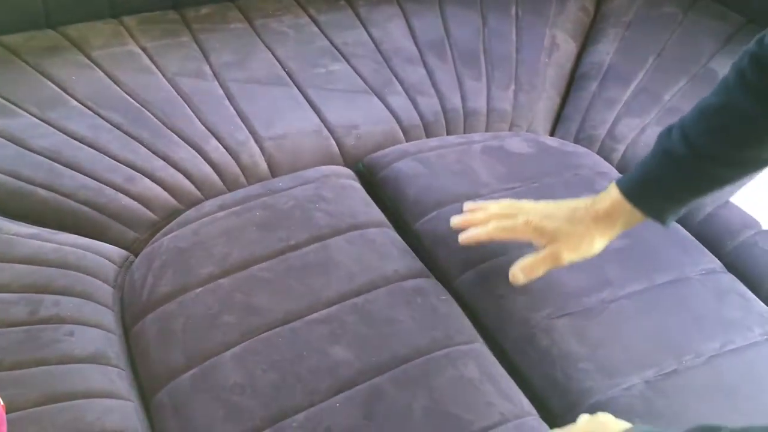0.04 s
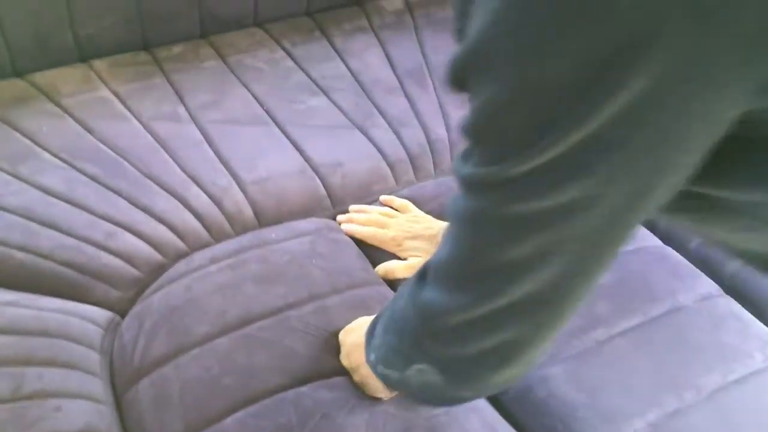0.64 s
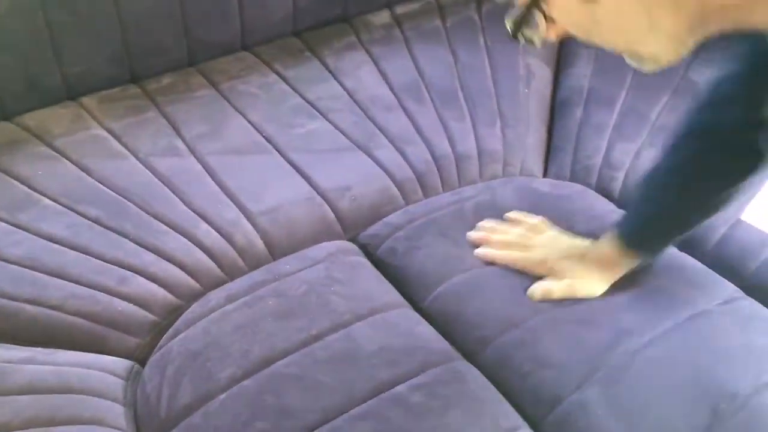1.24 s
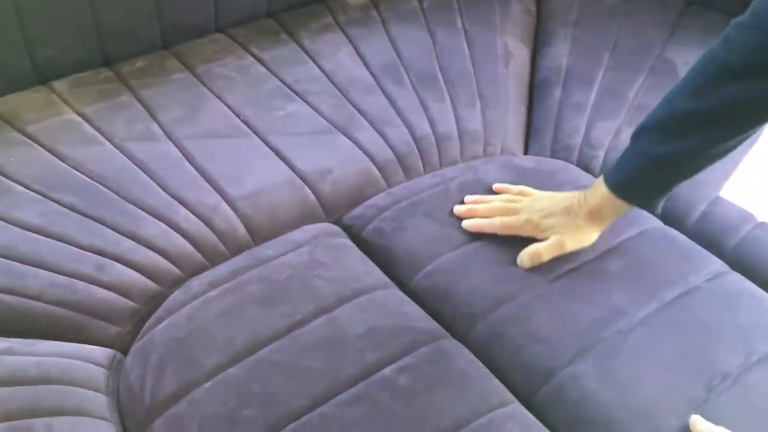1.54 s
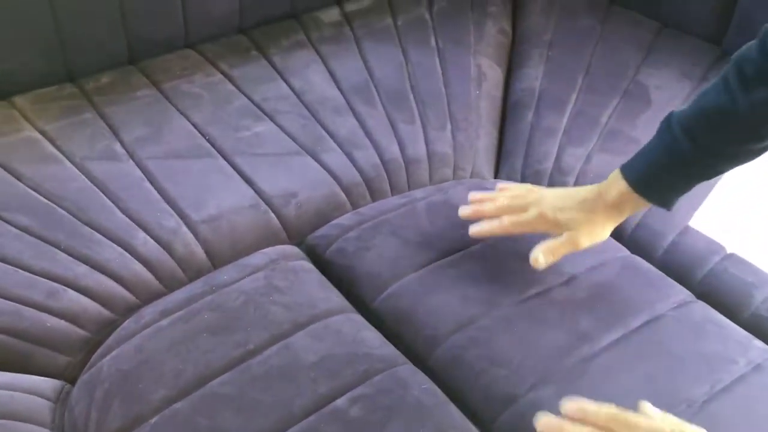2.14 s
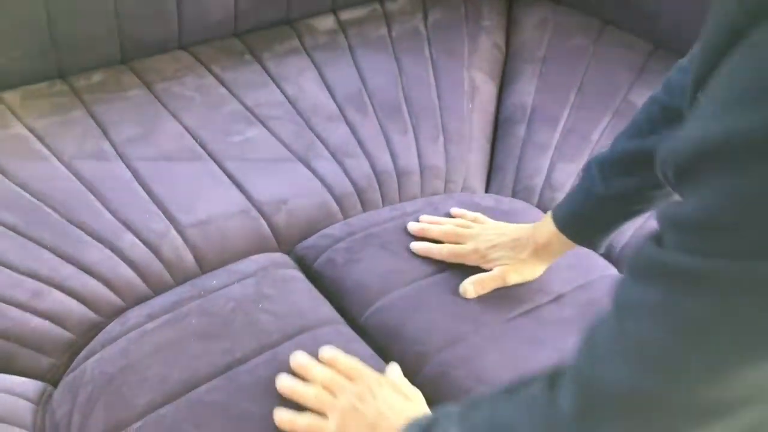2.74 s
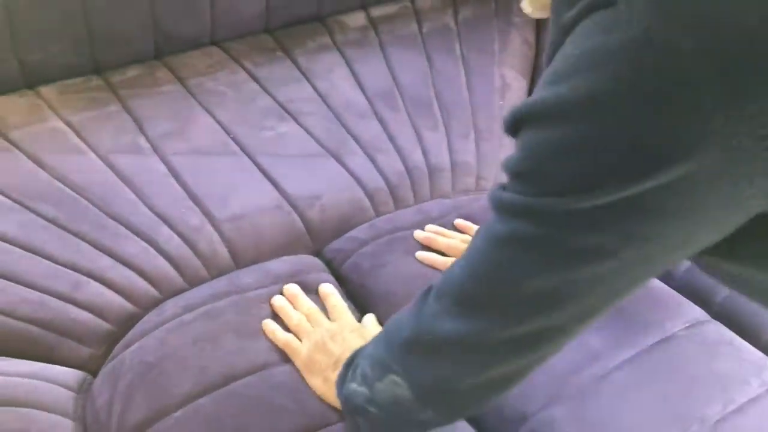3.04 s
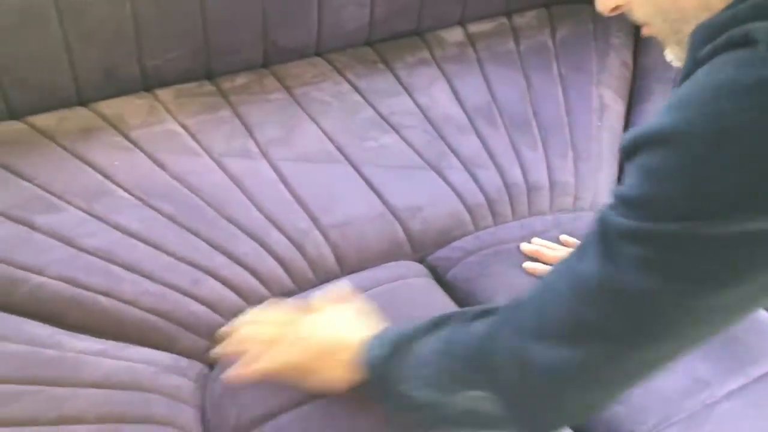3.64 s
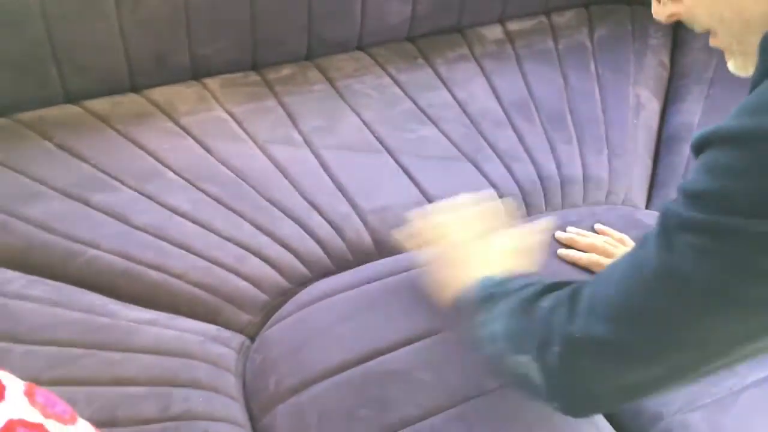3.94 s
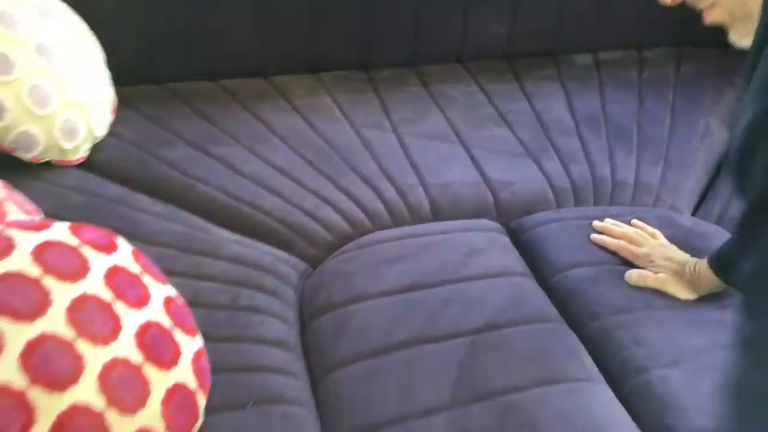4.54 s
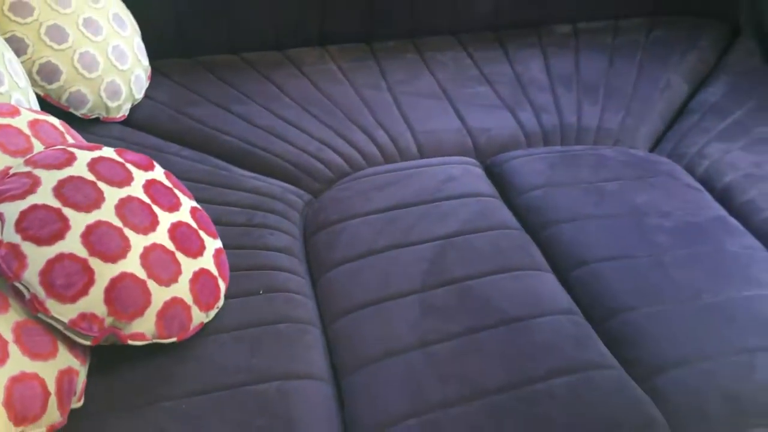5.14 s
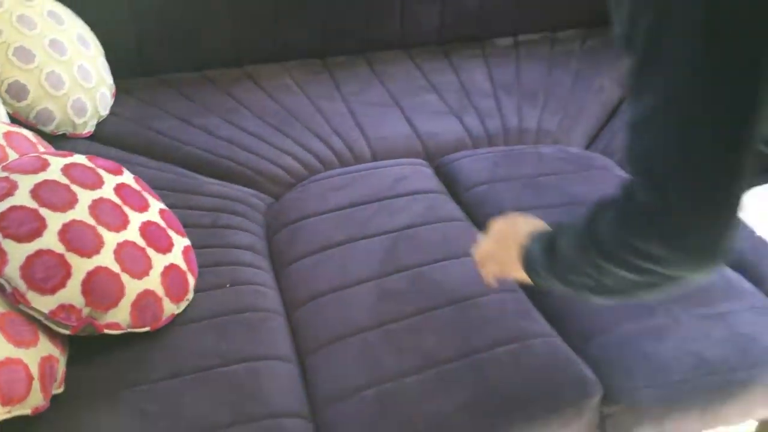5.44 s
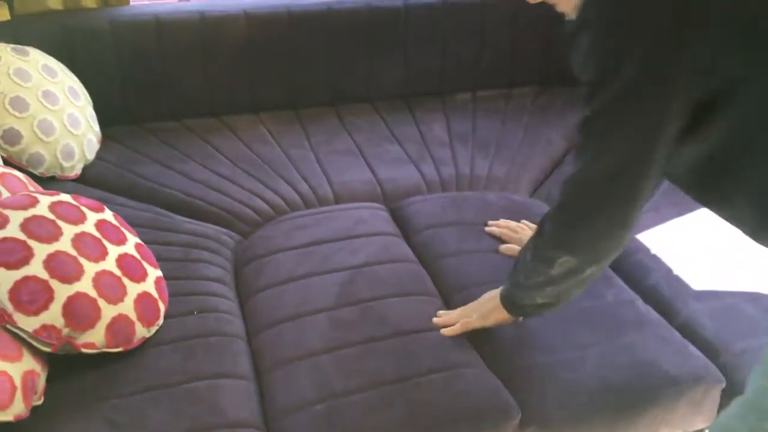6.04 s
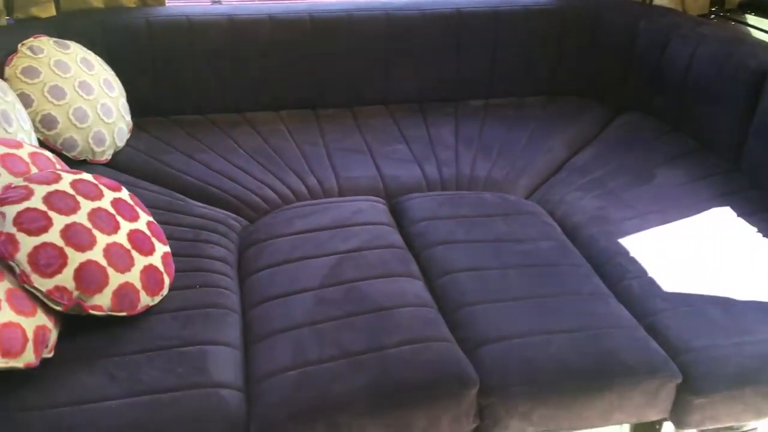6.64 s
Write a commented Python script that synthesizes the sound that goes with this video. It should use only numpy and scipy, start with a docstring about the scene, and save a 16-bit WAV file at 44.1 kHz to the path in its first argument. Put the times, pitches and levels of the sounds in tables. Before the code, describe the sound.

Dull pats on padded upholstery give way to swishing hand strokes, followed by a faint creak and soft footfalls.

```python
"""Hands pat, press and brush the velour seat cushions of a small caravan, close to the microphone.
Each impact expels the air under the palm, compresses the foam and excites the low modes of the board
and the seat box. Sliding friction hisses over the pile, the frame creaks by stick-slip, and feet boom
on the hollow floor. Outside are a low hum, distant traffic and faint birds."""
import sys
import numpy as np
from scipy import signal
from scipy.fft import rfft, irfft, next_fast_len
from scipy.io import wavfile

SR = 44100
rng = np.random.default_rng(int(sys.argv[2]) if len(sys.argv) > 2 else 0)


def dump_mix(stems):
    """Bounce the given channels to the path in sys.argv[1] as a 16-bit WAV at rate SR."""
    frames = np.atleast_2d(stems).T  # one column per channel
    limited = np.clip(frames, -1, 1)  # hard clip at full scale
    pcm = np.round(limited * 32767).astype(np.int16)
    wavfile.write(sys.argv[1], SR, pcm)


N = 299439
TIME = np.arange(N) / SR


def undb(db):
    """Amplitude grows tenfold for every 20 dB."""
    return 10 ** (np.asarray(db) / 20)


def unit(x):
    """Normalisation to an rms of 1."""
    return x / np.sqrt(np.mean(x ** 2))


def colour(x, points):
    """Spectral shaping: x is filtered by a curve of (Hz, dB) points and scaled to an rms of 1."""
    hz, db = np.transpose(points)
    size = next_fast_len(N)
    bins = np.maximum(np.fft.rfftfreq(size, 1 / SR), 1)
    gain = undb(np.interp(np.log(bins), np.log(hz), db))
    return unit(irfft(rfft(x, size) * gain, size)[:N])


def walk(rate):
    """Random modulation: straight lines join `rate` Gaussian values a second."""
    knots = rng.standard_normal(4096)
    return np.interp(TIME * rate, np.arange(len(knots)), knots)


def grains(rate, spread_db):
    """Shot noise: fibres catch at random moments, a few harder than the rest."""
    sizes = undb(spread_db * np.minimum(rng.exponential(size=N), 5))
    return unit((rng.random(N) < rate / SR) * sizes * rng.standard_normal(N))


def band_noise(order, edges_hz, samples):
    """Band-limited noise: white noise through a band-pass filter."""
    band = signal.butter(order, edges_hz, "bandpass", fs=SR, output="sos")
    return signal.sosfilt(band, rng.standard_normal(samples))


def add(out, start, sound):
    """Superposition: a sound joins the mix at `start` seconds."""
    i = max(int(start * SR), 0)
    out[i:i + len(sound)] += sound[:max(N - i, 0)]


def ring(modes, push_s, scatter):
    """Damped modes build up under a soft push and decay; the load detunes them a little."""
    t = TIME[:SR // 2]
    tones = 0
    for hz, db, t60 in modes:
        loaded_hz = hz * (1 + scatter * rng.standard_normal())
        tones += undb(db - 60 * t / t60) * np.sin(2 * np.pi * loaded_hz * t)
    return tones * (1 - np.exp(-(t / push_s) ** 2))


# Spectra of the traffic and of the noise around the hum. Each row: frequency in Hz, relative density in dB.
TRAFFIC_SPECTRUM = [(20, -21), (60, 12), (110, -4.5), (230, 1), (420, -13), (750, -12.5), (1250, -11.5),
                    (2000, -17), (3000, -26), (4300, -28), (6500, -33), (9500, -42.5), (11000, -49.5),
                    (15000, -48)]
HUM_NOISE_SPECTRUM = [(15, -23.5), (37, -3.5), (65, 7.5), (90, -28), (300, -51.5)]
# Partials of the hum. Each row: frequency in Hz, relative level in dB.
HUM_PARTIALS = [(54.5, -0.5), (108, -13), (226, -33.5)]
# Course of the background. Each row: time in seconds, traffic gain in dB, hum gain in dB.
OUTSIDE_GAINS = [(0, -52, -46), (1.1, -49.5, -47.5), (2.3, -53, -49), (2.8, -62, -55.5),
                 (3.6, -59.5, -53.5), (5, -58.5, -54.5), (6.45, -65.5, -58.5), (6.79, -65, -69.5)]


def outside():
    """Broadband traffic noise and a low hum, modulated in pitch and level, fade beyond the walls."""
    times, traffic_db, hum_db = np.transpose(OUTSIDE_GAINS)
    surge = undb(.8 * walk(4))
    traffic = colour(rng.standard_normal(N), TRAFFIC_SPECTRUM) * surge
    traffic *= undb(np.interp(TIME, times, traffic_db))
    wavering_time = np.cumsum(1 + 0.0059 * walk(5.09)) / SR
    partials = sum(undb(db) * np.sin(2 * np.pi * hz * wavering_time) for hz, db in HUM_PARTIALS)
    hum = unit(partials) * undb(.5 * walk(13))
    rumble = undb(-6.5) * colour(rng.standard_normal(N), HUM_NOISE_SPECTRUM)
    return traffic + (hum + rumble) * undb(np.interp(TIME, times, hum_db))


# The farthest birds. Each row: start in seconds, length in seconds, pitch in Hz, level in dB.
FAR_TWITTERS = [(0.0, 0.18, 9300, -69.5), (0.0, .3, 6500, -74.5), (5.36, 0.11, 4400, -70),
                (5.42, .2, 3600, -72), (6.62, 0.26, 8800, -75.5)]


def twitter(relative_width=0.17):
    """The quick, high notes of far birds blur into narrow-band noise."""
    out = np.zeros(N)
    for start, length, hz, db in FAR_TWITTERS:
        arch = np.sin(np.linspace(0, np.pi, int(length * SR)))
        edges_hz = [hz * (1 - relative_width / 2), hz * (1 + relative_width / 2)]
        notes = unit(band_noise(2, edges_hz, SR))[:len(arch)]
        add(out, start, undb(db) * np.sqrt(np.abs(arch)) * notes)
    return out


# Each row: start in seconds, length in seconds, held pitch in Hz, level in dB, swoop as a share of pitch.
BIRD_CALLS = [(.04, 0.044, 4460, -66.5, .2), (.285, 0.055, 4250, -65, 0.003),
              (0.401, 0.051, 4400, -66.5, 0.11), (0.698, 0.039, 4000, -59, 0.12),
              (0.98, 0.078, 4470, -62.5, .05), (1.67, 0.053, 4520, -63, .04),
              (2.298, 0.065, 4540, -56.5, 0.5)]


def bird():
    """Frequency modulation: each call swoops down to a wavering note and drops off at the end."""
    out, waver, tremor = np.zeros(N), walk(500), walk(200)
    for start, length, hz, db, swoop in BIRD_CALLS:
        progress = np.linspace(0, 1, int(length * SR))
        call = slice(int(start * SR), int(start * SR) + len(progress))
        pitch = hz * (1 + swoop * np.exp(-progress / .09) - .035 * progress ** 4 + 0.016 * waver[call])
        loudness = undb(db + 3.5 * tremor[call]) * np.sqrt(np.abs(np.sin(np.pi * progress)))
        add(out, start, loudness * np.sin(2 * np.pi * np.cumsum(pitch) / SR))
    return out


def gesture(start, attack, hold, release):
    """Friction noise follows hand speed: it rises 24.5 dB over the attack, holds and falls again."""
    away = np.maximum((start - TIME) / attack, (TIME - start - hold) / release)
    out, near = np.zeros(N), away < 4
    out[near] = undb(-24.5 * np.maximum(away[near], 0) ** 1.03)
    return out


# A hand slides over a cushion or eases off it. Each row: arrival at full speed, attack, hold and
# release in seconds, then gains of pile hiss, foam rasp and drag on the board in dB.
HAND_STROKES = [(.44, 0.18, 0.046, .04, -74, -66, -64), (0.765, 0.29, 0.17, 0.16, -63, -52, -53),
                (1.025, 0.14, 0.3, 0.064, -83, -60, -70), (1.264, 0.022, 0.053, .05, -53, -46, -43),
                (1.47, 0.082, 0.028, 0.099, -78, -43, -41.5), (1.544, 0.052, 0.027, 0.21, -52, -44, -43),
                (2.03, 0.096, 0.065, 0.25, -60, -44.5, -51.5), (2.607, .09, 0.035, 0.3, -64, -45, -46.5),
                (2.72, 0.21, 0.25, 0.16, -59.5, -63.5, -71), (2.972, 0.29, 0.12, 0.04, -53, -47, -57),
                (3.179, .012, 0.029, 0.42, -55, -51, -60), (3.389, 0.051, 0.038, 0.16, -53, -46.5, -49.5),
                (3.505, 0.18, 0.072, 0.07, -44.5, -48.5, -68), (3.738, 0.13, 0.063, .14, -40.5, -53.5, -61),
                (4.062, 0.0095, 0.013, 0.052, -43, -49, -39), (4.163, 0.085, 0.058, .11, -40, -56, -46.5),
                (4.412, 0.0038, 0.22, 0.071, -43.5, -49, -42), (5.028, 0.19, .1, 0.067, -43, -52, -46),
                (5.442, 0.12, 0.038, 0.15, -67.5, -62, -48), (5.637, 0.083, .02, 0.18, -61, -63.5, -66),
                (5.864, 0.05, 0.12, 0.41, -57, -51.5, -53), (6.093, 0.059, 0.12, .08, -61, -52, -68),
                (6.39, 0.45, 0.063, 0.2, -61.5, -63.5, -65), (6.531, .03, 0.0089, 0.2, -58, -60, -59)]


def contact():
    """Incoherent sources add in power: strokes, sinking palms and sleeves drive pile, foam and drag."""
    sink_db, sleeves_db = np.array([-43, -33, -47]), np.array([-77, -70, -66])  # pile, foam, drag
    moves = [(gesture(*row[:4]), row[4:]) for row in HAND_STROKES]
    # after every pat the palm sinks into the foam, the louder the harder it landed
    for start, _, _, pop_db, *_ in PALM_IMPACTS:
        sink = gesture(start - 0.0064, attack=0.018, hold=0.05, release=0.084)
        moves.append((sink, sink_db + 0.64 * pop_db))
    power = sum(np.outer(undb(dbs) ** 2, envelope ** 2) for envelope, dbs in moves)
    return np.sqrt(power + undb(sleeves_db)[:, None] ** 2)


# Friction spectra of pile, foam and board. Each row: frequency in Hz, relative density in dB.
PILE_SPECTRUM = [(200, -12.5), (500, -18.5), (1200, -5.5), (2000, 3), (2800, 0), (3900, 5.5), (4900, -0.5),
                 (6000, 2), (7500, -3), (9500, -2), (10400, -7.5), (11500, -4.5), (15500, -10)]
FOAM_SPECTRUM = [(100, -13), (270, 5.5), (480, -1), (720, -1), (1300, -3), (2000, -6.5), (2900, -12),
                 (5000, -22), (12000, -67)]
DRAG_SPECTRUM = [(18, -15.5), (35, -21.5), (60, -2), (88, 6), (130, 0), (200, -5), (300, -12), (450, -18.5),
                 (900, -55)]


def rubbing():
    """Sliding friction: the pile hisses, squeezed foam rasps lower, the cushion rumbles on its board."""
    grip = undb(.9 * walk(70))
    pile = colour(rng.standard_normal(N) + 0.38 * grains(rate=3000, spread_db=1), PILE_SPECTRUM) * grip
    foam = colour(rng.standard_normal(N) + 0.5 * grains(rate=900, spread_db=4), FOAM_SPECTRUM)
    foam *= undb(2.1 * walk(70))
    drag = colour(rng.standard_normal(N), DRAG_SPECTRUM)
    brush, press, shift = contact()
    return pile * brush + undb(-0.5) * foam * press + undb(2.5) * drag * shift


def slip_run(start=5.776, count=6, first_gap_s=.0185, slowing=1.28, hz=1010, decay_s=0.011):
    """Stick-slip of the frame under leaning weight: a run of ticks that slows and peaks near its end."""
    gaps = first_gap_s * slowing ** np.arange(count)
    times = start + np.cumsum(gaps) - gaps
    levels_db = -40.5 - 12 * (np.linspace(0, 1, count) - 0.78) ** 2
    return [(time, db, hz, decay_s) for time, db in zip(times, levels_db)]


# Ticks of frame, seams and cuffs.
# Each row: start in seconds, level in dB, nominal band frequency in Hz, decay time in seconds.
SLIP_TICKS = [(0.284, -57.5, 5970, .008), (.52, -30.5, 1200, 0.0032), (0.642, -44, 12900, 0.0053),
              (1.253, -47.5, 3020, 0.021), (1.82, -45, 2000, 0.0029), (2.564, -38, 2810, 0.0019),
              (3.165, -42.5, 1360, 0.013), (3.182, -37, 1130, 0.013), (4.05, -55, 1386, 0.012),
              (4.344, -39, 593, 0.0085), (4.408, -58, 1010, 0.0097), (4.854, -55.5, 490, 0.025),
              (5.189, -41.5, 2000, 0.0082), (5.357, -55, 3000, 0.0053)]


def creaks():
    """A brief transient has a broad spectrum: each slip is a fast-decaying burst of noise."""
    out, t = np.zeros(N), TIME[:SR // 10]
    for start, db, hz, decay in SLIP_TICKS + slip_run():
        burst = unit(band_noise(3, [hz / 8.9, min(hz * 1.54, SR / 2 - 1000)], len(t)))
        add(out, start, undb(db) * burst * np.exp(-t / decay))
    return out


def swell(t, rise, fall):
    """Exponential growth up to t = 0 and exponential decay after it."""
    return np.exp(-np.abs(t) / np.where(t < 0, rise, fall))


def smack(t):
    """A pressure impulse: one steep step that swings back within a millisecond."""
    after = np.maximum(t, 0)
    return (1 - np.exp(-after / .00006)) * np.exp(-after / 0.00022) * np.cos(2 * np.pi * 1200 * after)


# Skin slapping the velour. Each row: frequency in Hz, relative density in dB.
SLAP_SPECTRUM = [(40, -47), (200, 2), (350, 9.5), (450, 2), (700, -4), (1000, -6.5), (1400, -7),
                 (2100, -13), (3800, -21.5), (7500, -34.5), (15000, -53)]
# Membrane modes of the taut cover. Each row: frequency in Hz, relative level in dB.
COVER_MODES = [(304, 0.5), (455, -14.5), (770, -18)]
# Modes of the plywood board under the foam and of the hollow seat box.
# Each row: frequency in Hz, relative level in dB, time to fall 60 dB in seconds.
BOARD_MODES = [(93.6, 2, 0.19), (112.5, -8.5, 0.33), (140.5, -1, 0.19), (209.5, -6, 0.18),
               (306.5, -7, 0.15)]
BOX_MODES = [(30.35, -17.5, 0.96), (55.1, 2.5, 0.31), (66, 4, 0.19)]
# A palm lands on a cushion. Each row: time in seconds, air pop frequency in Hz, pop decay time in
# seconds, then gains of pop, cover, board, slap and crack in dB.
PALM_IMPACTS = [(0.538, 193.5, 0.012, -11, -25.5, -18, -27.5, -35),
                (1.294, 173, 0.012, -14, -21, -20.5, -31, -52),
                (1.835, 183, 0.0093, -9.5, -9, -14, -22, -26), (2.439, 174, 0.01, -6, -17, -18, -21, -6),
                (3.024, 204, 0.016, -29, -37, -35, -37, -42),
                (3.114, 245, 0.0026, -38, -42.5, -37, -45, -60),
                (3.574, 257, 0.0044, -41, -47, -40, -40.5, -52),
                (3.686, 376, 0.007, -51, -41.5, -45, -43, -51),
                (3.812, 173, 0.0087, -24, -24.5, -23.5, -24, -10),
                (4.057, 604, 0.0054, -40, -34, -36, -61, -48),
                (4.218, 226, 0.0039, -22, -28.5, -25, -24.5, -5),
                (4.416, 633, 0.0061, -41.5, -30.5, -32, -48, -44),
                (5.221, 174, 0.021, -44, -33, -33, -49, -55)]


def pats():
    """Impact excitation: the palm pops the trapped air and the foam passes the push to board and box."""
    out, lead_s = np.zeros(N), .016  # the fingers touch before the palm
    t = TIME[:SR // 4] - lead_s
    touch = np.clip((t + lead_s) / .001, 0, 1)
    skin = colour(rng.standard_normal(N) + .5 * grains(rate=1500, spread_db=5), SLAP_SPECTRUM)
    slap_envelope = swell(t, rise=0.0099, fall=0.0069) + 0.057 * swell(t, rise=0.015, fall=0.014)
    cover = sum(undb(db) * np.sin(2 * np.pi * hz * t) for hz, db in COVER_MODES)
    cover *= swell(t, rise=0.0038, fall=0.0058)
    crack = smack(t + 0.00094) + 0.39 * smack(t - .0032)  # heel of the hand, then ball of the thumb
    for start, pop_hz, pop_decay, pop_db, cover_db, board_db, slap_db, crack_db in PALM_IMPACTS:
        pitch = pop_hz * (1 - .11 * np.tanh(t / 0.024))  # falls as the hand buries itself in the foam
        phase = 2 * np.pi * np.cumsum(pitch) / SR
        pop = np.sin(phase - np.interp(0, t, phase)) * swell(t, rise=0.66 * pop_decay, fall=pop_decay)
        slap = skin[int(start * SR):][:len(t)] * slap_envelope
        blow = undb(slap_db) * slap - undb(pop_db) * pop - undb(cover_db) * cover - undb(crack_db) * crack
        add(out, start - lead_s, touch * blow)
        add(out, start - .003, undb(board_db) * ring(BOARD_MODES, push_s=0.0053, scatter=0.019))
        box_db = 4.5 + 1.45 * board_db  # nonlinear: mainly firm pats reach the box
        add(out, start + 0.0011, undb(box_db) * ring(BOX_MODES, push_s=.022, scatter=0.045))
    return out


# Low booms of the seat box: a strong one with the second pat, softer ones just after the first and
# fourth. Each row: start in seconds, gain in dB.
BOX_BOOMS = [(1.297, -12), (0.616, -21), (0.657, -33), (2.505, -25)]


def box_booms():
    """Modal resonance: the hollow seat box booms in its low, damped modes."""
    out = np.zeros(N)
    for start, db in BOX_BOOMS:
        add(out, start, undb(db) * ring(BOX_MODES, push_s=0.028, scatter=0.028))
    return out


# Each row: peak time in seconds, half length in seconds, resonance in Hz, level in dB.
SKIN_SCUFFS = [(0.78, .03, 980, -51.5), (1.087, 0.19, 780, -57), (1.496, 0.067, 1270, -47),
               (1.615, 0.082, 1066, -51.5), (2.045, 0.051, 990, -51.5), (2.124, 0.049, 620, -52),
               (2.655, 0.019, 1040, -44.5), (3.028, 0.036, 1200, -40), (3.02, 0.13, 3450, -59),
               (3.486, 0.13, 2220, -50), (4.53, 0.076, 380, -51), (5.06, 0.098, 323, -48),
               (5.224, 0.039, 796, -52), (5.793, 0.096, 330, -52.5)]


def scuffs():
    """Stick-slip friction: skin catches unevenly on the pile and drives a resonance of the taut cover."""
    out = np.zeros(N)
    slips = grains(rate=700, spread_db=1) + 0.82 * rng.standard_normal(N)
    for peak, half_length, hz, db in SKIN_SCUFFS:
        cover = signal.lfilter(*signal.iirpeak(hz, Q=3.5, fs=SR), slips)
        out += undb(db) * unit(cover) * np.exp(-((TIME - peak) / half_length) ** 2)
    return out


# Each row: frequency in Hz, relative level in dB, time to fall 60 dB in seconds.
FLOOR_MODES = [(87.6, 3, 0.21), (103, -4, 0.15), (155.7, -14.5, 0.32)]
# Feet shift on the floor. Each row: start in seconds, gain in dB.
FOOTFALLS = [(5.44, -60), (5.69, -37.5), (5.861, -33.5), (5.986, -38.5), (6.118, -33.5), (6.192, -36.5),
             (6.33, -41.5), (6.448, -36.5)]


def steps():
    """Modal resonance: the hollow floor booms under soft footfalls."""
    out = np.zeros(N)
    for start, db in FOOTFALLS:
        add(out, start, undb(db) * ring(FLOOR_MODES, push_s=0.0096, scatter=0.041))
    return out


# Peaks and cancellations between the close walls. Each row: frequency in Hz, width in Hz, gain in dB.
STANDING_WAVES = [(284, 75, 1.5), (425.5, 55, -6.5), (554, 14, 3.5), (663, 26, 4.5), (1310, 390, 2)]
# Echoes from window, ceiling and lockers. Each row: delay in seconds, gain in dB.
EARLY_REFLECTIONS = [(.0023, -43.5), (.0051, -27.5), (.0083, -16.5), (0.0126, -17)]


def cabin(x):
    """Reflection in a small, padded room gives standing waves, early echoes and a very short tail."""
    for hz, width, db in STANDING_WAVES:
        x = x + (undb(db) - 1) * signal.lfilter(*signal.iirpeak(hz, hz / width, fs=SR), x)
    t = TIME[:SR // 4]
    tail = band_noise(1, [400, 5000], len(t)) * np.exp(-t / 0.026) * (t > .006)
    response = undb(-20) * tail / np.sqrt(np.sum(tail ** 2))
    for delay, db in EARLY_REFLECTIONS:
        response[int(delay * SR)] += undb(db)
    # thin panels let the bass through instead of returning it
    panels = signal.butter(2, 400, "highpass", fs=SR, output="sos")
    return x + signal.sosfilt(panels, signal.fftconvolve(x, response)[:N])


def scene():
    """Superposition: close sounds ring in the cabin, and the outside lies beneath them."""
    inside = cabin(pats() + box_booms() + undb(-1.0) * rubbing() + scuffs() + creaks() + steps())
    return (inside + bird() + outside() + twitter())[None]


def record(dry):
    """Band limiting: the microphone loses the deepest bass, and the top is cut steeply."""
    dry = signal.sosfilt(signal.butter(2, 20, "highpass", fs=SR, output="sos"), dry)
    return signal.sosfilt(signal.ellip(10, .2, 80, 15550, fs=SR, output="sos"), dry)


dry = scene()
out = record(dry)
dump_mix(out)
```